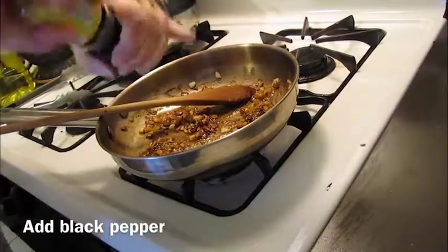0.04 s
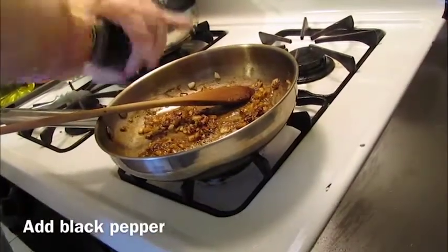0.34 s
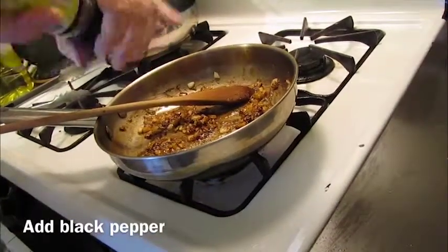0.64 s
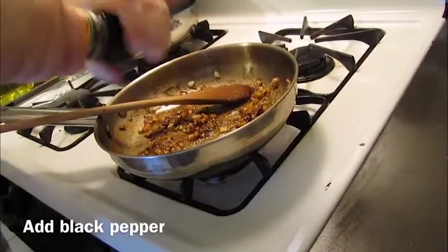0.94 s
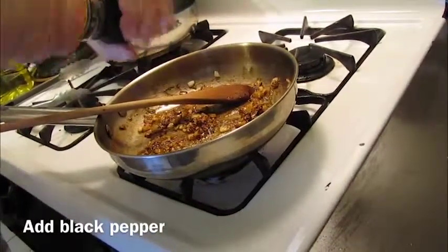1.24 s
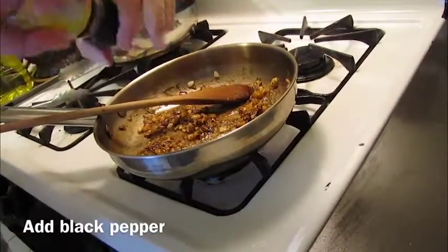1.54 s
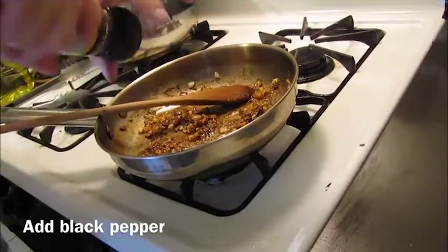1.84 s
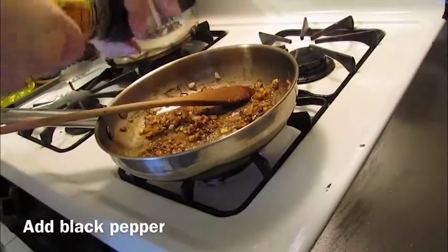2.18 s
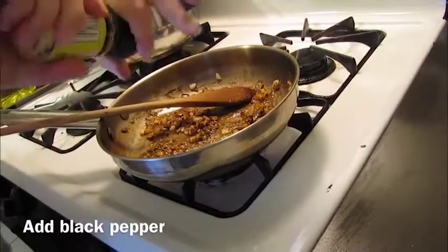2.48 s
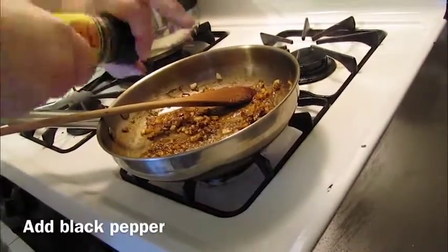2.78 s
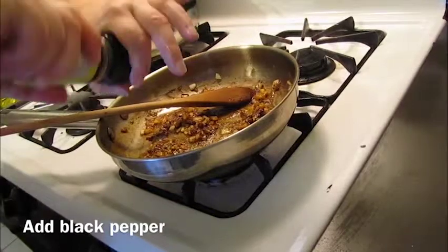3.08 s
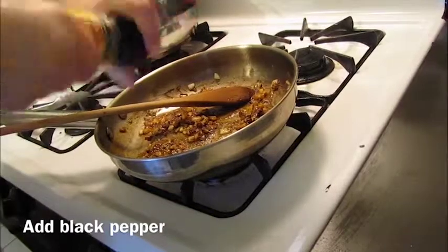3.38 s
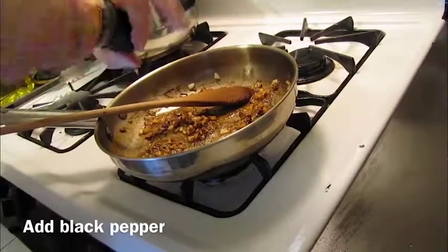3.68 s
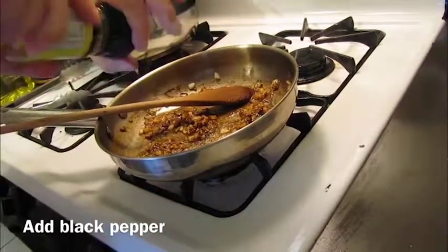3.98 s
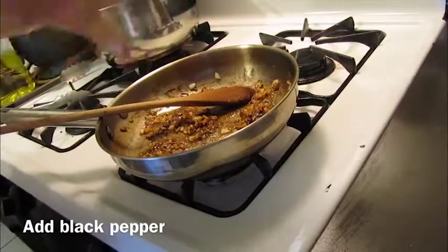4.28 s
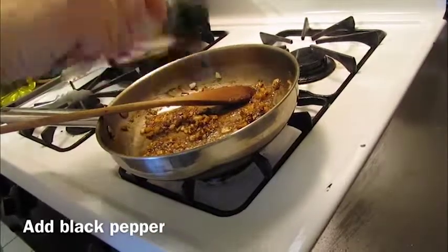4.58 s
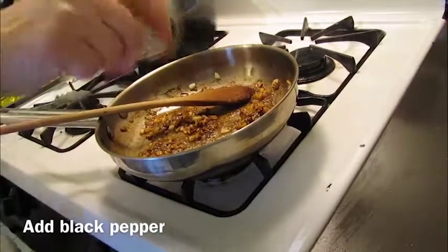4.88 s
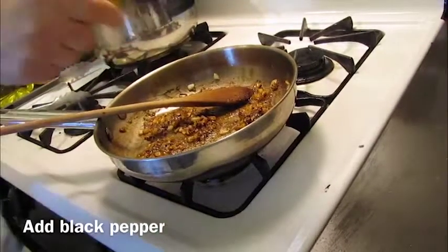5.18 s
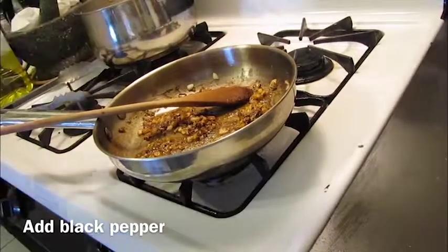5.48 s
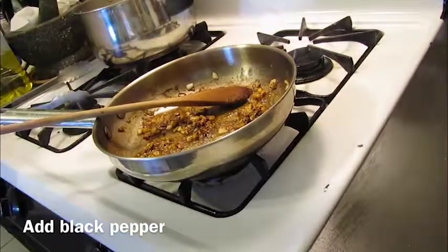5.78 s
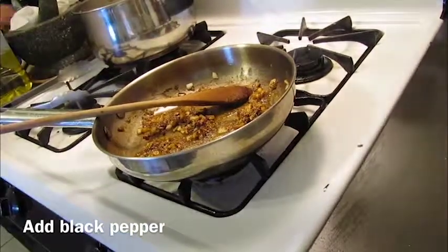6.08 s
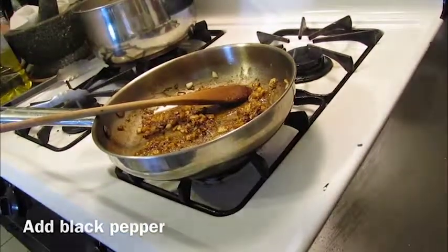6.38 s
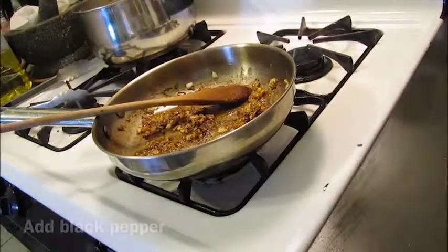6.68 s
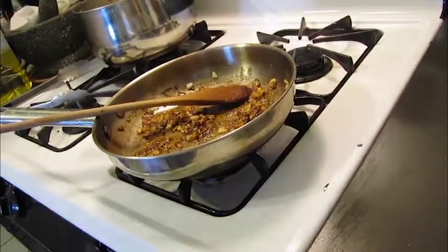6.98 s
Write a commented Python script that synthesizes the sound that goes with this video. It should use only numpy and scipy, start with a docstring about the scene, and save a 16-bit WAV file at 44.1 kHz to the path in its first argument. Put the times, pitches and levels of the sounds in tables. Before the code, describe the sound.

In a small kitchen, a hand pepper mill is twisted nine times close to the microphone, about twice a second, each turn a short, crisp crunch of cracking peppercorns. Loose corns then rattle thinly in the jar, with a few soft, low bumps. The mill lands on the counter with one knock and settles. A gas flame and a faintly sizzling pan hiss underneath throughout.

```python
"""In a small kitchen, a hand pepper mill is twisted nine times over a pan on a lit gas stove.
Peppercorns crumble and crack, and each fracture excites the resonances of the burr and the hollow cap.
Loose corns rattle in the jar as the mill is carried off; it meets the counter with one knock and settles.
The cook bumps about softly, the flame rushes and hums, and the pan sizzles faintly.
An automatic gain control turns the level down after loud sounds and lets it creep back."""
import sys
import numpy as np
from scipy import signal
from scipy.fft import rfft, irfft
from scipy.io import wavfile
from scipy.ndimage import uniform_filter1d

SR = 44100
rng = np.random.default_rng(int(sys.argv[2]) if len(sys.argv) > 2 else 0)


def unload_audio(sound):
    """Save the sound as a 16-bit wav file, at the path given as the first command line argument."""
    columns = np.transpose(np.atleast_2d(sound))
    # keep every value between -1 and 1, then stretch to whole-number steps
    steps = np.round(np.clip(columns, -1, 1) * 32767)
    wavfile.write(sys.argv[1], SR, steps.astype(np.int16))


N = 314874
TIME = np.arange(N) / SR

# nine twists and a small nudge; the grip tunes the hollow under the hand and the clamped burr:
# (start [s], end [s], cap drive [dB], burr drive [dB], force change [dB], hollow [Hz], burr [Hz])
MILL_TWISTS = [(0.207, 0.271, -41, -34.5, 0, 2300, 6900), (0.784, 0.904, -41.5, -41, -19.5, 1990, 7540),
               (1.226, 1.316, -37.5, -35, 0.5, 2150, 7650), (1.639, 1.723, -40.5, -36, 7.5, 1810, 7230),
               (2.033, 2.102, -38.5, -33.5, 4, 1820, 6970), (2.312, 2.335, -51.5, -50, 3, 1530, 7000),
               (2.617, 2.692, -41.5, -40, 6.5, 2020, 6650), (3.238, 3.354, -45.5, -43, -2.5, 1750, 6530),
               (3.68, 3.773, -43, -38, 8.5, 1790, 6900), (4.072, 4.147, -42.5, -35.5, 6, 1940, 6650)]
# the loudest cracks of a corn or snaps of the burr: (time [s], cap drive [dB], burr drive [dB])
CORN_CRACKS = [(0.0571, -29, -20), (0.2176, -16, -14), (0.227, -7.5, -6), (0.7539, -9.5, -8.5),
               (0.758, -19, -10), (0.7833, -6.5, -7), (0.794, -15, -20), (0.808, -17, -8.5),
               (0.8546, -14, -6.5), (0.8869, -10.5, -6.5), (1.2158, -30, -13), (1.2299, -15, -13),
               (1.2576, -29, -3), (1.2678, -7.5, -2.5), (1.2705, -3, -2), (1.3081, -8, -6),
               (1.6531, -21, -13), (1.6649, -17, -4), (1.6905, -8, -4), (2.0498, -9, -4), (2.1119, -6, -26),
               (2.257, -25, -22), (2.3238, -23, -28), (2.646, -9.5, -1.5), (2.6867, -11, -11),
               (2.6964, -9.5, -16), (3.2185, -12, -1), (3.2218, -7, -2.5), (3.2364, -8.5, -2.5),
               (3.447, -20, -27), (3.719, -8, -6.5), (3.7691, -10, -10), (4.0691, -5.5, -12),
               (4.099, -11, -5), (4.113, -11, 0), (4.481, -24, -18)]
# fingers sliding back over the cap: (start [s], end [s], drive [dB])
FINGER_SLIDES = [(0.376, 0.456, -37.5), (2.316, 2.39, -40.5), (2.872, 2.933, -41)]
# jolts that throw loose corns against the jar: (time [s], drive [dB])
JAR_JOLTS = [(4.585, -30.5), (4.722, -39.5), (4.777, -28.5), (4.852, -37.5), (4.893, -41.5), (4.943, -29),
             (5.02, -35), (5.095, -28.5), (5.163, -33), (5.232, -35)]
# the mill lands, then settles as the hand lets go: (time [s], push [dB], contact [s], first rebound [s])
COUNTER_KNOCKS = [(6.5322, 5, 0.00049, 0.0032), (6.75, -12.5, 0.00083, 0.0062),
                  (6.793, -15.5, 0.0013, 0.0087)]
# the cook moving at the stove: (time [s], drive [dB], pitch [Hz])
COOK_BUMPS = [(0.645, -48, 115), (1.571, -50, 111), (3.564, -43, 110), (4.833, -37, 115), (5.087, -30, 220),
              (5.122, -46, 185), (5.51, -36, 133), (5.656, -34, 239)]
# modes of the hollow cap: (frequency [Hz], bandwidth [Hz], relative level [dB])
CAP_MODES = [(560, 130, 2), (1140, 65, 1), (1420, 160, 7.5), (2180, 300, 18), (2680, 660, 8),
             (2740, 730, 4), (3590, 620, 8.5)]
# modes of the burr: (frequency [Hz], bandwidth [Hz], relative level [dB])
BURR_MODES = [(6040, 210, 14), (6970, 260, 9.5), (7700, 1200, -39), (9800, 1830, -6), (12000, 1500, -17)]
# modes of the jar wall: (frequency [Hz], bandwidth [Hz], relative level [dB])
JAR_MODES = [(5910, 204, -12), (7060, 370, -14.5), (8900, 620, -16.5), (13060, 800, -11.5),
             (14300, 3800, -36)]
# modes of the struck counter: (frequency [Hz], bandwidth [Hz], relative level [dB])
COUNTER_MODES = [(124, 30, 9), (186, 34, 14.5), (498, 40, 16), (564, 150, 3.5), (705, 84, 11.5),
                 (820, 180, 10), (890, 140, 8), (1010, 44, -14), (1180, 130, 11), (1470, 100, 0),
                 (1020, 390, -4), (2340, 1300, 0)]
# spectrum of the burner and the pan: (frequency [Hz], relative level [dB])
STOVE_SPECTRUM = [(15, -52), (25, -16), (107, -11.5), (152, -13.5), (178, -6.5), (281, -5), (445, -8.5),
                  (523, -7.5), (567, -6.5), (684, -11), (1750, -9), (2920, -6.5), (4040, -11), (8130, -9.5),
                  (15500, -16.5)]
# tones of the flame: (frequency [Hz], relative level [dB])
FLAME_TONES = [(296, -21.5), (581.4, -17.5)]
# the stove grows louder after the grinding ends: (time [s], gain [dB])
STOVE_ENVELOPE = [(0, -44), (.14, -49), (.4, -43.5), (4.5, -42.5), (5.5, -38.5), (6.4, -38.5)]
# a diffuse field differs between the ears more in the treble: (frequency [Hz], side minus mid [dB])
DIFFUSE_WIDTH = [(100, -16.5), (600, -12.5), (1300, -8), (2400, -5), (4400, -2), (15000, -2)]


def grinding():
    """Impact excitation: crumbling and single cracks ring both the hollow cap and the hard burr."""
    _, _, cap_drive, burr_drive, _, hollow_hz, burr_hz = np.transpose(MILL_TWISTS)
    times, cap_db, burr_db = np.transpose(CORN_CRACKS)
    cap = impulses(times, cap_db) + crushing(cap_drive, rate=1100, scatter_db=2, edge_s=.0053)
    burr = impulses(times, burr_db) + crushing(burr_drive, rate=1300, scatter_db=6.5, edge_s=.013)
    # while the hand winds back, fingers drag on the cap and grit keeps creeping in the burr
    cap += undb(-17) * bursts(*np.transpose(FINGER_SLIDES), rate=1300, scatter_db=-4, edge_s=.09)
    burr += bursts([.3], [4.5], [-59], rate=3500, scatter_db=-5, edge_s=.096)
    cap = disperse(cap, trip_s=.0005, reflection=.48)
    burr = disperse(burr, trip_s=.0001717, reflection=.61)
    cap = gripped_ring(cap, CAP_MODES, hollow_hz, width_hz=300, mode_db=18.5)
    burr = gripped_ring(burr, BURR_MODES, burr_hz, width_hz=570, mode_db=12)
    cap = band(cap, low_hz=455, high_hz=3730)
    burr = band(burr, low_hz=4700, high_hz=15800)
    return (kitchen(cap, near_db=1.5, near_s=.016, room_db=-3, room_s=.23, lag_s=5e-6, pan_db=-1)
            + kitchen(burr, near_db=-5, near_s=.019, room_db=-3, room_s=.12, lag_s=27e-6, pan_db=3.5))


def crushing(drive_db, rate, scatter_db, edge_s):
    """Brittle fracture: each twist grazes the corns, bites with a growing or easing force, and lets go."""
    graze_s, graze_db = .025, -14.5  # light contact before and after the bite
    out, grains = np.zeros(N), shot_noise(rate, scatter_db)
    for (start, end, _, _, change_db, _, _), db in zip(MILL_TWISTS, drive_db):
        span = around(start, end)
        t = TIME[span]
        inside_s = np.minimum(t - start, end - t)
        bite = np.clip(inside_s / edge_s + .5, 0, 1)
        graze = undb(graze_db) * np.clip((inside_s + graze_s) / edge_s + .5, 0, 1)
        progress = np.clip((t - start) / (end - start), 0, 1)
        force = undb(db + change_db * (progress - .5))
        out[span] += force * np.maximum(bite, graze) * grains[span] / np.std(grains[span][bite > 0])
    return out


def disperse(push, trip_s, reflection):
    """All-pass dispersion: echoes along two paths in the mill spread a shock but keep its energy."""
    spectrum = rfft(push)
    for path_s in (trip_s, trip_s * np.sqrt(np.e)):
        trip = delay_phase(path_s)
        spectrum = spectrum * (trip - reflection) / (1 - reflection * trip)
    return irfft(spectrum, N)


def gripped_ring(push, modes, grip_hz, width_hz, mode_db):
    """Variable resonance: the grip and the spot where a corn breaks tune one mode; the rest stay put."""
    spot_spread, spot_s = .079, .009  # fractional pitch shift, time spent at one spot
    regrips = [int((start - .12) * SR) for start, *_ in MILL_TWISTS[1:]]
    spots = rng.integers(-1, 2, N)[(TIME / spot_s).astype(int)]
    out = np.zeros(N)
    for spot in (-1, 0, 1):
        pieces = np.split(push * (spots == spot), regrips)
        pitches = grip_hz * (1 + spot_spread * spot)
        rung = [ring(piece, modes + [(hz, width_hz, mode_db)]) for piece, hz in zip(pieces, pitches)]
        out += np.concatenate(rung)
    return out


def counter_knock():
    """Elastic impact: the mill strikes the counter and rocks; a longer contact gives a duller knock."""
    loss_db, softening, slowing = -1.6, .1, 1.1  # rebounds grow weaker, longer and further apart
    push = np.zeros(N)
    for start, db, contact_s, rebound_s in COUNTER_KNOCKS:
        span = around(start, start)
        for bounce in range(4):
            since_s = TIME[span] - start - rebound_s * bounce ** slowing
            progress = np.clip(since_s / (contact_s * (1 + softening * bounce)), 0, 1)
            pulse = np.sin(np.pi * progress) ** 2
            push[span] += undb(db + loss_db * bounce) * pulse / pulse.sum()
    knock = band(ring(push, COUNTER_MODES), low_hz=147, high_hz=3600)
    return kitchen(knock, near_db=1.5, near_s=.12, room_db=-1, room_s=.36, lag_s=5e-6, pan_db=1)


def jar_rattle():
    """Free vibration: whole corns tumble against the wall of the jar, which rings high and thin."""
    landing_s, stray_s = .0095, .024  # spread either side of a jolt
    times, db = np.transpose(JAR_JOLTS)
    landing = bursts(times - landing_s, times + landing_s, db, rate=600, scatter_db=4, edge_s=.0099)
    rolling = bursts(times[:1], times[-1:], [-54], rate=330, scatter_db=10, edge_s=.11)
    jar = np.zeros(N)
    for hz, width_hz, mode_db in JAR_MODES:
        # each corn lands at another spot, so the modes do not always sound together
        strays = bursts(times - stray_s, times + stray_s, db - 7, rate=900, scatter_db=2, edge_s=.012)
        jar += undb(mode_db) * ring(landing + rolling + strays, [(hz, width_hz, 0)])
    jar = band(jar, low_hz=4200, high_hz=19200)
    return kitchen(jar, near_db=-8, near_s=.035, room_db=-16, room_s=.27, lag_s=24e-6, pan_db=1)


def finger_friction():
    """Friction noise: skin brushes the plastic cap with a fine, broad hiss."""
    slides = np.transpose(FINGER_SLIDES)
    mid, side = (bursts(*slides, rate=8000, scatter_db=1.5, edge_s=.04) for _ in range(2))
    return band(diffuse(mid, side), low_hz=5200, high_hz=13600)


def cook_bumps():
    """Heavy damping: the cook's movements make soft, low bumps that hardly ring."""
    bumps, width_hz = np.zeros(N), 110
    for start, db, hz in COOK_BUMPS:
        span = around(start, start)
        bumps[span] += ring(impulses([start], [db])[span], [(hz, width_hz, 0)])
    bumps = band(bumps, low_hz=80, high_hz=330)
    return kitchen(bumps, near_db=5.5, near_s=.11, room_db=1, room_s=.53, lag_s=0, pan_db=-2)


def stove():
    """Noise and tones: the flame rushes and hums; bursting bubbles of fat prickle in the hiss."""
    bubbles_per_s, drift_hz = 3000, 1.11
    rush = rng.standard_normal((2, N))
    bubbles = (rng.random((2, N)) < bubbles_per_s / SR) * rng.standard_normal((2, N))
    sizzle = undb(-6) * unit_rms(band(bubbles, low_hz=2370, high_hz=14500))
    hiss = unit_rms(colour(diffuse(*(rush + sizzle)), STOVE_SPECTRUM))
    hum = np.zeros(N)
    for hz, db in FLAME_TONES:
        phase = 2 * np.pi * np.cumsum(hz + drift_hz * wander(rate=8)) / SR
        hum += undb(db) * np.sqrt(2) * np.sin(phase)
    hum_swell = undb(np.interp(TIME, [5.3, 5.7], [-7, 0]))  # the hum grows louder after the grinding ends
    return (hiss + hum * hum_swell) * undb(np.interp(TIME, *np.transpose(STOVE_ENVELOPE)))


def kitchen(x, near_db, near_s, room_db, room_s, lag_s, pan_db):
    """Reverberation: direct sound, quick reflections from near surfaces, and the room's short decay."""
    t = TIME[:SR // 2]
    onset = np.clip(t / .001 - 1, 0, 1)
    response = 0
    for db, t60_s in ((near_db, near_s), (room_db, room_s)):
        tail = diffuse(*rng.standard_normal((2, len(t)))) * onset * undb(-60 * t / t60_s)
        response += undb(db) * unit_rms(tail) / np.sqrt(len(t))
    right = irfft(rfft(x) * delay_phase(lag_s), N)  # the right microphone is a little further away
    direct = np.array([x * undb(pan_db / 2), right * undb(-pan_db / 2)])
    return direct + signal.fftconvolve(x[None], response, axes=1)[:, :N]


def diffuse(mid, side):
    """Diffuse field: two unrelated signals become one sound from all round."""
    side = colour(side, DIFFUSE_WIDTH)
    return np.array([mid + side, mid - side])


def ring(push, modes):
    """Modal superposition: a push drives damped sinusoids; a unit impulse peaks at 1."""
    t = TIME[:SR // 10]
    response = sum(undb(db) * width * np.exp(-np.pi * width * t) * np.cos(2 * np.pi * hz * t)
                   for hz, width, db in modes)
    return signal.oaconvolve(push, response / np.abs(response).max())[:len(push)]


def bursts(starts, ends, db, rate, scatter_db, edge_s):
    """Amplitude modulation: showers of tiny pushes swell in and die away."""
    out, grains = np.zeros(N), shot_noise(rate, scatter_db)
    for start, end, gain in zip(starts, ends, undb(db)):
        span = around(start, end)
        inside_s = np.minimum(TIME[span] - start, end - TIME[span])
        window = np.clip(inside_s / edge_s + .5, 0, 1)
        out[span] += gain * window * grains[span] / (np.std(grains[span][window > 0]) + 1e-9)
    return out


def shot_noise(rate, scatter_db):
    """Shot noise: `rate` random pushes a second, their levels in a logistic distribution."""
    count = int(rate * N / SR)
    place, size, sign = rng.random((70000, 3))[:count].T
    gains = undb(scatter_db * np.log(size / (1 - size)) / 2) * np.sign(sign - .5)
    return np.bincount((place * N).astype(int), gains, N)


def impulses(times, db):
    """Ideal impulses: one sharp push at each time."""
    return np.bincount((np.asarray(times) * SR).astype(int), undb(db), N)[:N]


def wander(rate):
    """Random drift: `rate` values a second, joined by straight lines."""
    knots = np.arange(0, TIME[-1] + 1, 1 / rate)
    return np.interp(TIME, knots, rng.standard_normal(len(knots)))


def colour(x, points):
    """Spectral shaping by points of (frequency [Hz], gain [dB])."""
    hz, db = np.transpose(points)
    bins = np.maximum(np.fft.rfftfreq(x.shape[-1], 1 / SR), 1)
    return irfft(rfft(x) * undb(np.interp(np.log(bins), np.log(hz), db)), x.shape[-1])


def band(x, low_hz, high_hz):
    """Band-pass filtering with second-order slopes."""
    return signal.sosfilt(signal.butter(2, [low_hz, high_hz], "band", fs=SR, output="sos"), x)


def delay_phase(delay_s):
    """Shift theorem: a delay turns the phase in proportion to frequency."""
    return np.exp(-2j * np.pi * np.fft.rfftfreq(N, 1 / SR) * delay_s)


def around(start, end):
    """Time window: an event with 0.1 s on either side."""
    return slice(max(int((start - .1) * SR), 0), int((end + .1) * SR))


def undb(db):
    """Decibels to amplitude ratio."""
    return 10 ** (np.asarray(db) / 20)


def unit_rms(x):
    """Normalisation to unit power."""
    return x / np.sqrt(np.mean(x ** 2) + 1e-18)


def gain_control(x):
    """Compression: the gain falls quickly after a loud sound and creeps back up."""
    threshold_db, share, makeup_db = -31, .23, 1.5
    attack_s, release_s = .014, .74
    hop = SR // 1000
    levels = uniform_filter1d(np.abs(x).mean(axis=0), hop)[::hop]
    held, excess_db = 1e-9, []
    for level in levels:
        held += (level - held) * hop / SR / (attack_s if level > held else release_s)
        excess_db.append(max(20 * np.log10(held) - threshold_db, 0))
    return x * undb(makeup_db - share * np.interp(TIME, TIME[::hop], excess_db))


def scene():
    """Superposition: all sources add at the microphones."""
    return grinding() + finger_friction() + jar_rattle() + counter_knock() + cook_bumps() + stove()


def record(dry):
    """Band limiting: after the gain control, a steep low-pass cuts the top of the treble."""
    top_hz = 16300
    return signal.sosfilt(signal.ellip(10, .2, 80, top_hz, fs=SR, output="sos"), gain_control(dry))


dry = scene()
out = record(dry)
unload_audio(out)
```